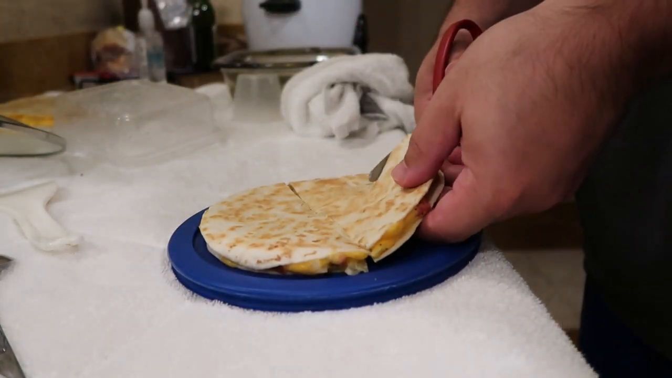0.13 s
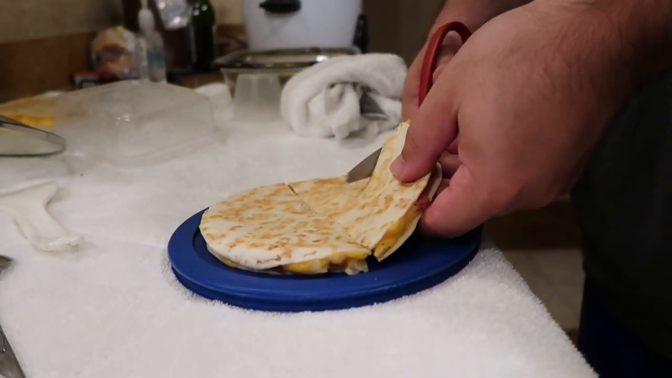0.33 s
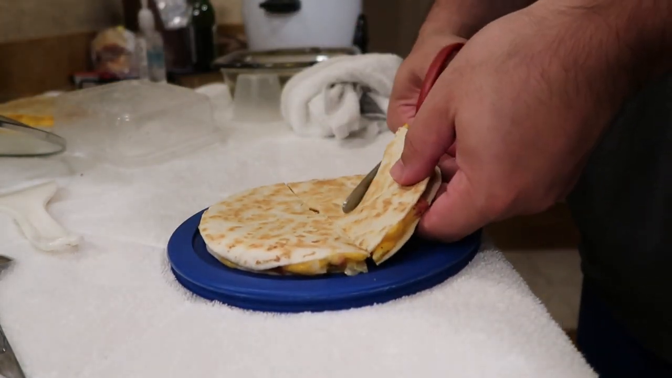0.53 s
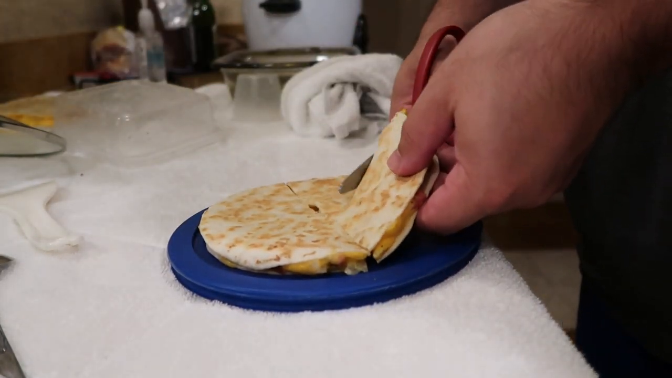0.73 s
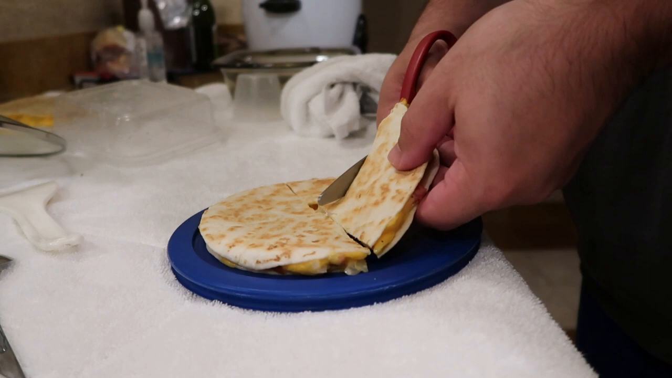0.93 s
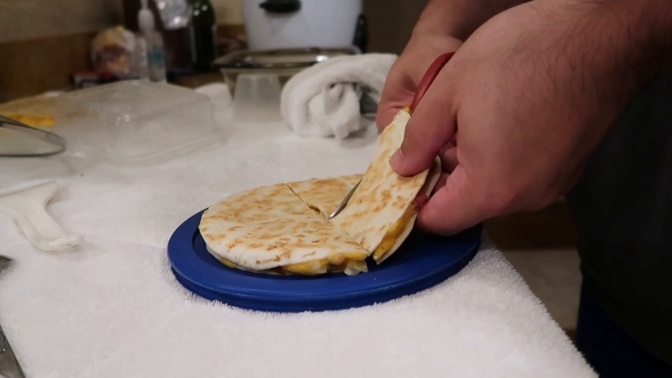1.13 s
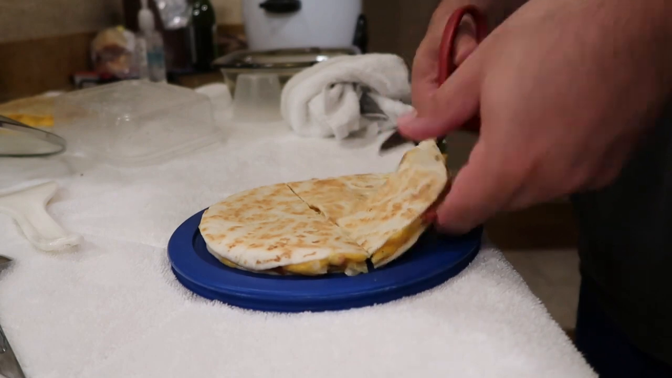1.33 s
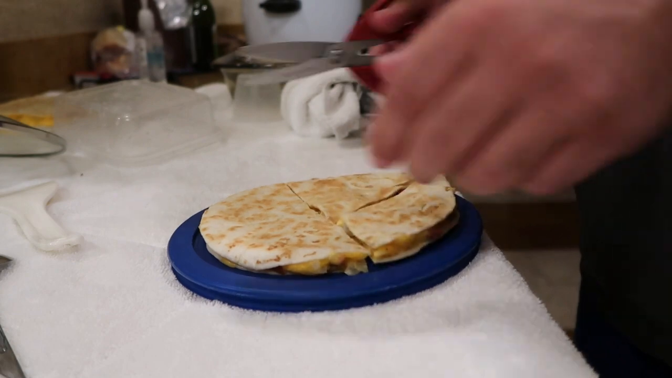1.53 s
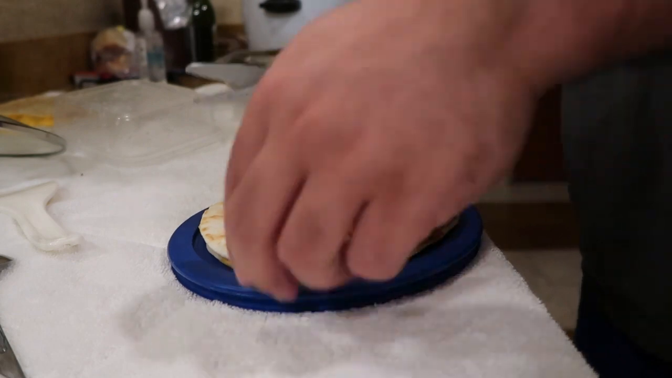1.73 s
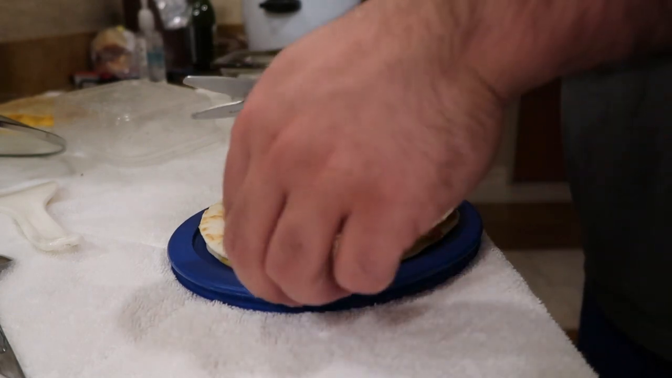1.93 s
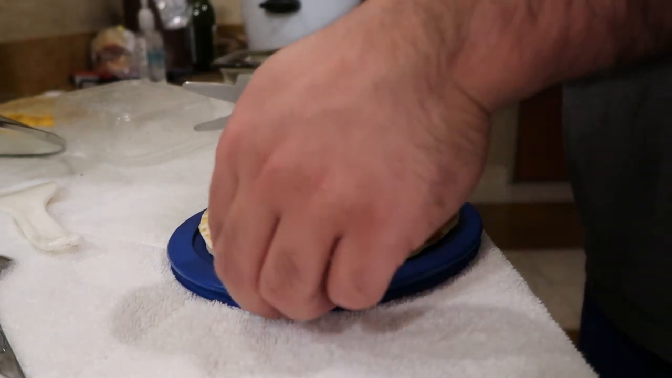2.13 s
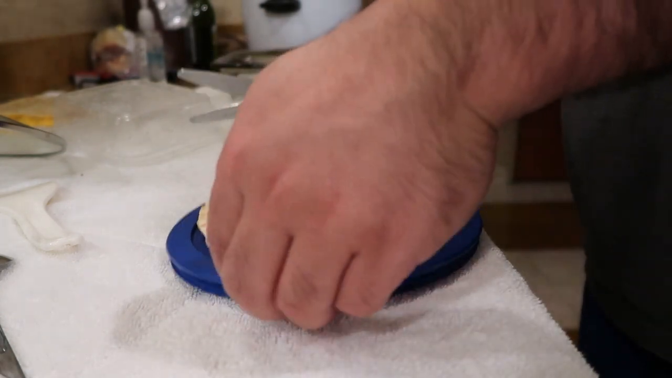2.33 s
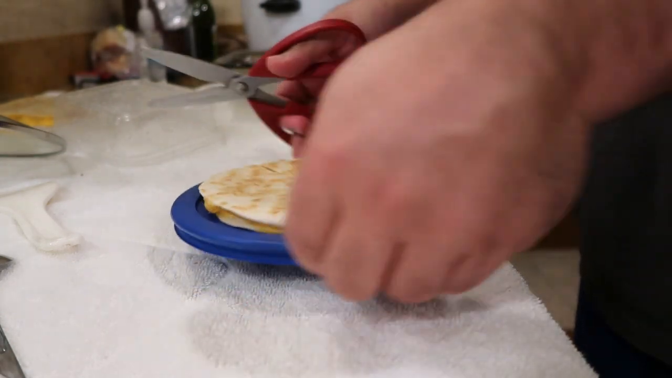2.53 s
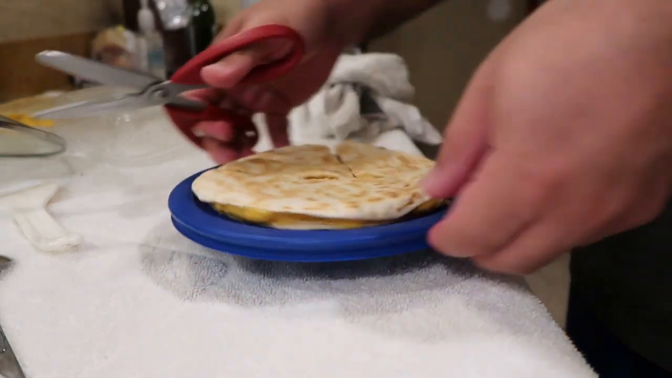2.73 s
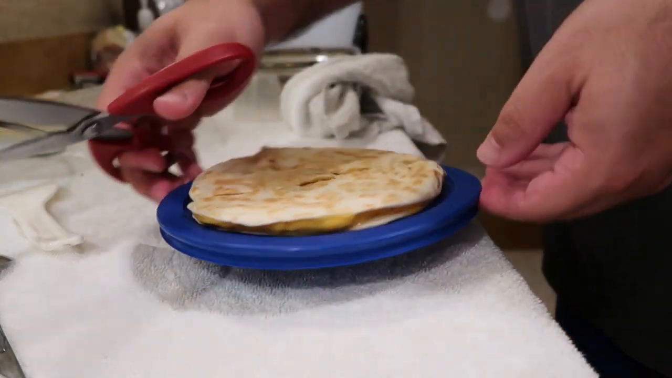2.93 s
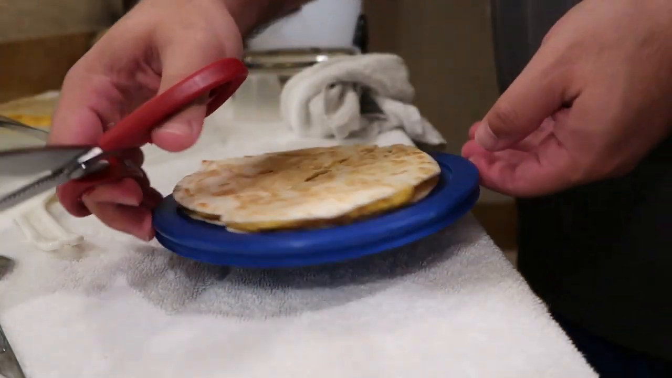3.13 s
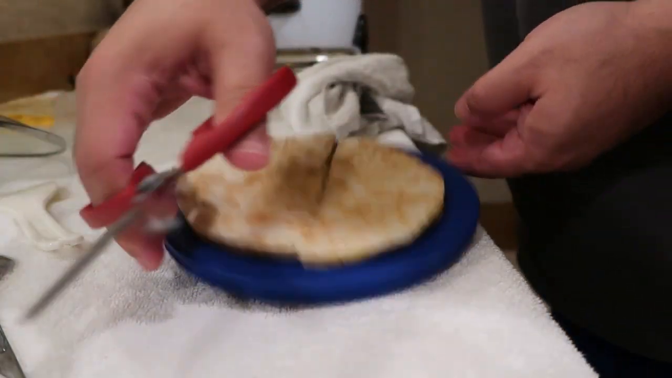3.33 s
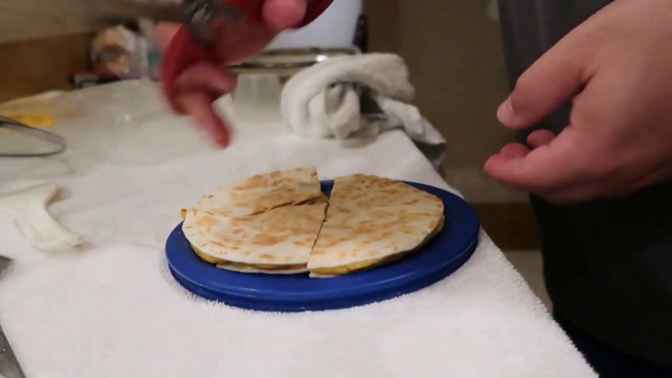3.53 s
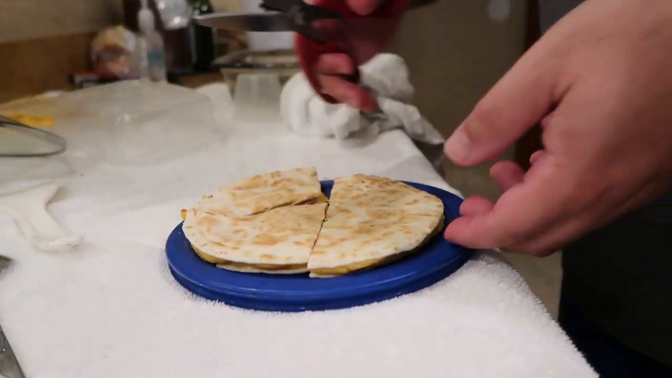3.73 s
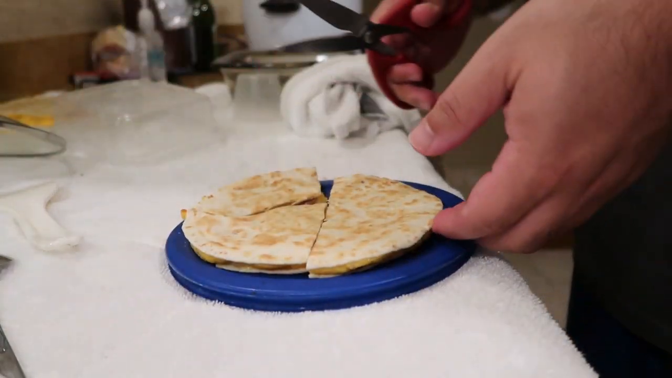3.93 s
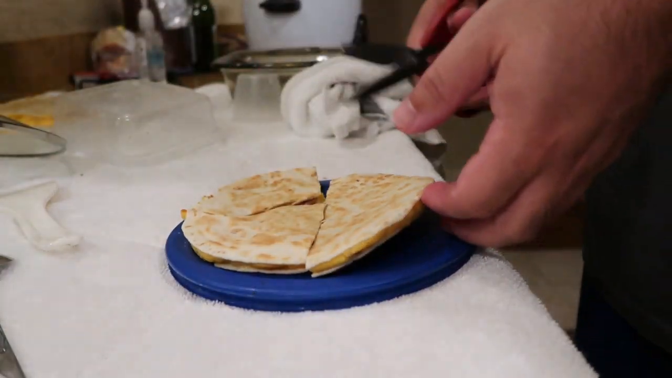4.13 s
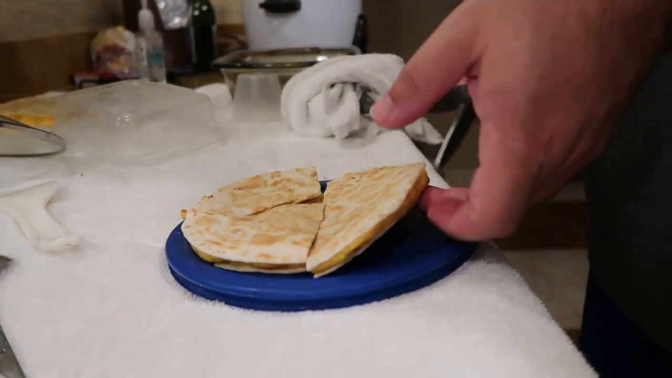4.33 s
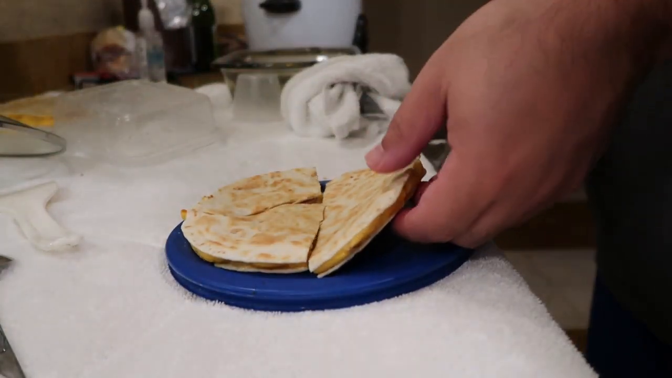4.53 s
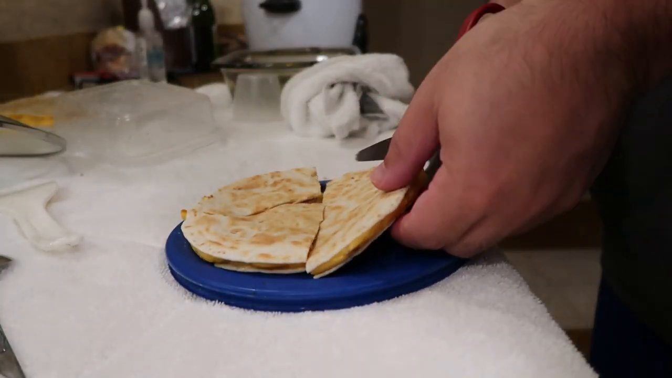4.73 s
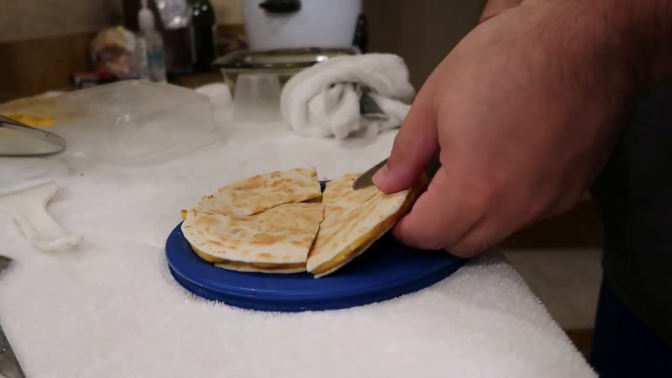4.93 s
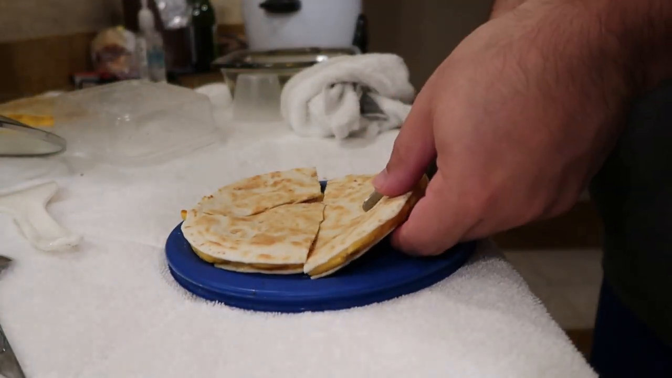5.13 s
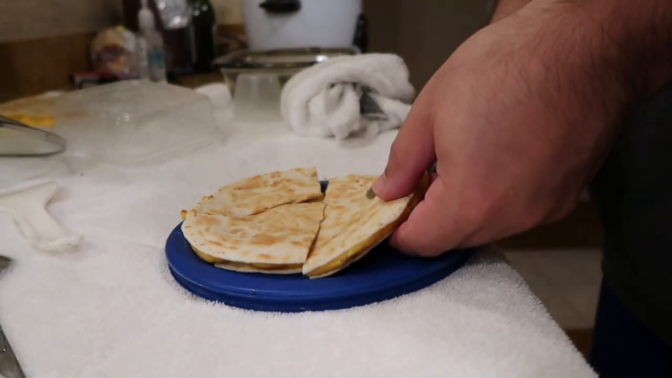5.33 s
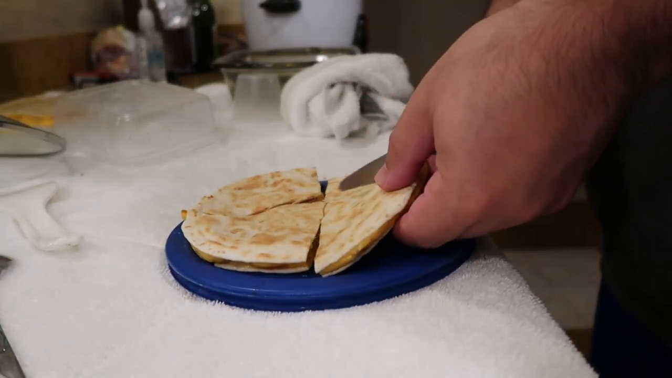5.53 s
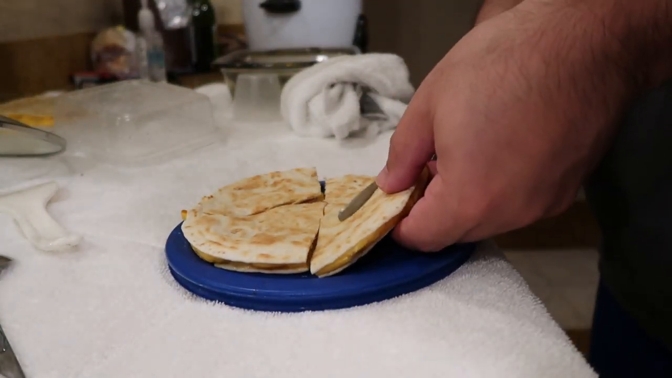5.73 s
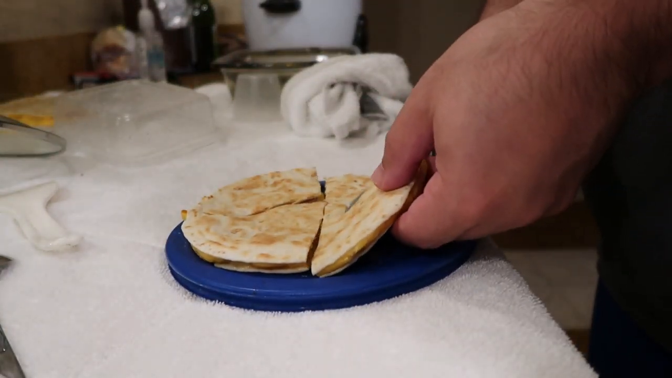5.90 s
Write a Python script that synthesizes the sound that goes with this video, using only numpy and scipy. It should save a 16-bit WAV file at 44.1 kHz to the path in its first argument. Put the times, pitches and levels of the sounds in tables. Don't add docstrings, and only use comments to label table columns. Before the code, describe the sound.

Three crunchy scissor snips come in quick succession, the third hardest, with small crust cracks and plate ticks around them. Only the low motor roar remains briefly, then a hollow rap and a hard plastic plate landing on the counter. Sparse knocks and taps lead to one last snip. Close stereo microphone, short lively kitchen echo.

```python
import sys
import numpy as np
from scipy import signal
from scipy.fft import rfft, irfft
from scipy.io import wavfile
from scipy.ndimage import uniform_filter1d

SR = 44100
rng = np.random.default_rng(int(sys.argv[2]) if len(sys.argv) > 2 else 0)


def field_ratio(decibels):
    return 10 ** (np.asarray(decibels, dtype=float) / 20)


def output_pcm(signal):
    pcm = np.clip(np.atleast_2d(signal).T, -1, 1) * 32767
    wavfile.write(sys.argv[1], SR, np.round(pcm).astype(np.int16))


N = 267422

# frequency in Hz, level in dB.
HUM_MID = [(15, -48), (25, -2), (49, 1), (87, -8.5), (161, -2), (285, -12), (373, -10.5), (516, -15),
           (624, -17), (695, -22), (754, -20), (1610, -26.5), (4370, -34.5), (12900, -53), (16000, -63)]
# frequency in Hz, level in dB.
HUM_SIDE = [(15, -53), (25, -26), (223, -4), (427, -5), (503, -10), (1260, -15.5), (3520, -23),
            (4870, -22.5), (6210, -29), (13200, -37.5), (16000, -43)]
# frequency in Hz, bandwidth in Hz, level in dB.
DRONES = [(40.2, 13, -69), (61.1, 3.7, -47), (87.9, 10, -50.5), (116, 7.9, -52), (164, 14.2, -53.5),
          (196.7, 10.7, -62), (389.9, 83, -57)]
HUM_DB, HUM_SIDE_DB = -41.5, -55.5

# start in seconds, end in seconds, first force in dB,
# last force in dB, share of steel hiss in dB.
STROKES = [(0.0, 0.033, -49, -58, -18), (0.132, 0.172, -59, -51.5, -22), (0.554, 0.678, -61.5, -48.5, -18),
           (1.058, 1.14, -59, -61, -19), (1.138, 1.192, -60, -43.5, -22), (1.383, 1.42, -52, -61, -22),
           (1.428, 1.517, -49.5, -59, -17), (3.393, 3.463, -54, -53, -20), (3.46, 3.485, -53, -43, -25),
           (5.04, 5.153, -65, -55.5, -13), (5.155, 5.277, -49.5, -53, -13.5), (5.705, 5.754, -52, -64, -12),
           (5.762, 5.876, -64, -49, -26), (1.53, 1.582, -49, -66, -11)]
# frequency in Hz, level in dB.
CRUST = [(700, 4), (1500, 7.5), (2500, 4), (4000, -1), (5500, -9.5), (8000, -27)]
# frequency in Hz, level in dB.
STEEL = [(3000, -16), (6000, 8), (9000, 2), (12500, -5), (15000, 1), (16500, -14)]
EASE_S = 0.0038
BITE_DB, BITE_S, BITE_HISS_DB = -25, 0.0044, -8

# start in seconds, peak in dB, brightness in dB per octave, room send in dB.
SNIPS = [
    (0.034, -16, -0.1, -0.5),
    (0.6822, -16.5, -0.5, -1),
    (1.1956, -11, -0.15, -2),
    (5.878, -15, -1.1, -2),
]
# frequency in Hz, level in dB.
BLADES = [(180, -33), (300, -7), (713, 0.5), (1120, -8.5), (1660, 6.5), (2170, 1), (3080, 2.5),
          (3580, -4.5), (4520, 2), (7320, -8), (10900, -7.5), (14000, -15), (15000, -30), (16000, -53)]
# frequency in Hz, time to fall 60 dB in seconds, level in dB.
BLADE_MODES = [(1710, 0.037, -4), (2630, 0.018, 0), (4600, 0.042, 3), (5280, 0.035, -10), (9300, 0.033, -1),
               (10900, 0.077, -5)]

# start in seconds, peak in dB, pitch in Hz, room send in dB.
CRACKS = [(0.159, -38, 3500, -8), (0.6085, -48, 3000, 8), (0.6404, -38, 3080, -9), (0.6476, -31, 3200, 1),
          (0.6603, -26.5, 2600, -16), (1.097, -41, 3030, -5), (1.448, -30.5, 2320, -5),
          (1.482, -36, 2830, -15), (1.4869, -33.5, 2520, -14), (1.5274, -25, 3220, -6.5),
          (1.9277, -56, 3330, 8), (4.5373, -46, 2520, -8), (5.171, -38, 2820, -9), (5.225, -37, 2330, -16),
          (5.266, -33, 1750, -6), (5.4046, -44, 2690, -18), (5.7106, -36.5, 2900, -14),
          (5.8052, -39.5, 3300, -15), (0.137, -44, 2800, -10), (1.148, -44, 3200, -10),
          (5.38, -46, 3600, -10), (5.762, -44, 2500, -10), (3.471, -40, 2800, -8)]
FLAKE_WIDTH_HZ = 1430

# start in seconds, peak in dB, brightness in dB per octave,
# room send in dB.
TAPS = [
    (0.2485, -40, -3, -5),
    (1.386, -37, 2, 0.5),
    (1.436, -35, 6, -2),
    (1.537, -27.5, -0.2, -11.5),
    (3.834, -33.5, 0, -10),
    (5.155, -26.5, -0.5, -5),
    (5.452, -20, -0.2, -5.5),
]
# frequency in Hz, level in dB.
TIP = [(180, -24), (300, -2), (531, 1.5), (806, -9.5), (1590, -1.5), (1940, -10), (2230, -6), (2990, -11.5),
       (3380, -12.5), (6280, -47), (6780, -45), (12000, -56), (15600, -82), (22000, -120)]
# start in seconds, peak in dB, brightness in dB per octave,
# room send in dB.
KNOCKS = [
    (0.909, -27.5, 0.1, -2.5),
    (3.882, -30, 0.1, -6),
    (4.231, -41, 0.1, -3),
    (4.673, -27.5, 0.1, 0),
    (5.664, -31, 0.1, -1),
    (6.031, -19.5, 0.1, -8),
]
# frequency in Hz, level in dB.
BASE = [(180, -28), (300, -5), (902, 2), (1340, -9.5), (2020, -1.5), (2790, -28.5), (3000, -10.5),
        (3690, -18.5), (5320, -38), (5900, -36), (6830, -45), (10000, -58), (13000, -78), (22000, -120)]
# start in seconds, peak in dB, brightness in dB per octave, room send in dB.
RAP = [
    (3.029, -16.5, 0.1, -5.5),
]
# frequency in Hz, level in dB.
RIM = [(290, -28), (500, -15), (972, -2.5), (1260, -18.5), (1560, 5.5), (2280, -7), (2580, -18),
       (2890, -2.5), (3280, -14.5), (4110, -19.5), (6060, -39), (9280, -52), (10000, -72), (13000, -104),
       (22000, -120)]
# start in seconds, peak in dB, brightness in dB per octave, room send in dB.
LANDING = [
    (3.4849, -20.5, -10.5, -7),
    (3.4898, -16, -0.5, -3.5),
    (3.4963, -16, 3.5, -15),
    (3.4979, -5, 0.3, -9),
    (3.5736, -38.5, 2, 3),
]
# frequency in Hz, level in dB.
LANDED = [(71, -17.5), (120, -2.5), (455, -9), (1090, 2), (1300, -2), (1470, -18), (1990, -0.5),
          (2290, -13), (3300, -14.5), (3870, -20.5), (4200, -24), (6420, -34), (9050, -47), (12500, -50),
          (15000, -61)]
# start in seconds, level in dB, frequency in Hz,
# time to fall 60 dB in seconds.
THUMP = [
    (3.488, -26, 70, 0.15),
    (3.495, -36, 39.7, 0.96),
]

# frequency in Hz, time to fall 60 dB in seconds.
KITCHEN = [(250, 0.44), (660, 0.48), (1740, 0.32), (4590, 0.25), (12100, 0.29)]
# delay in seconds, level in dB.
EARLY = [(.0031, -16), (.0059, -12), (.0088, -14), (.011, -15), (.016, -15), (.024, -15)]
# frequency in Hz, likeness from -1 to 1.
ALIKE = [(300, 1.0), (1500, 1), (3000, 0.91), (6000, 0.22), (9000, -0.49), (13000, -0.81)]
# frequency in Hz, side over mid in dB.
WIDEN = [(300, -31), (1000, -23), (2500, -22), (4500, -5.5), (8000, 0), (11000, 9.5), (15000, -7)]


def evened(x):
    return x / np.sqrt(np.mean(x ** 2) + 1e-20)


def read(points, hz):
    f, value = np.transpose(points)
    return np.interp(np.log(hz + 1), np.log(f + 1), value)


def add(mix, s, sound):
    part = mix[..., round(s * SR):][..., :len(sound)]
    part += sound[:part.shape[-1]]


def colour(points, tilt_db=0):
    hz = abs(np.fft.fftfreq(2048, 1 / SR))
    log_gain = np.log(field_ratio(read(points, hz) + tilt_db * np.log2((hz + 100) / 3000)))
    return np.fft.ifft(np.exp(np.conj(signal.hilbert(log_gain)))).real[:1024]


def shaped_noise(points, patchy_db):
    hz = np.fft.rfftfreq(2048, 1 / SR)
    a, b, patches = rng.standard_normal((N // 512 + 5, 1025, 3)).T
    patches = uniform_filter1d(patches, size=20, axis=0)
    patches = evened(uniform_filter1d(patches, size=8, axis=1))
    z = (a + 1j * b) * field_ratio(read(points, hz)[:, None] + patchy_db * patches)
    return evened(signal.istft(z, nperseg=2048, noverlap=1536)[1][:N])


def place(near, sends, s, db, sound, smooth, send_db):
    sound = field_ratio(db) * sound / abs(sound).max()
    add(near, s, sound)
    add(sends, s, field_ratio(send_db) * smooth * np.linalg.norm(sound) / np.linalg.norm(smooth))


def jolts(draw, t60):
    t = np.arange(len(draw)) / SR
    blows = draw * abs(draw)
    envelope = (1 - np.exp(-t / 0.0006)) * field_ratio(-60 * t / t60)
    z = rfft(blows * envelope, 2048)
    flat = z / np.sqrt(uniform_filter1d(abs(z) ** 2, size=15))
    return irfft(flat)[:len(draw)]


def struck(near, sends, blows, body, rattle_s, air_db=-1.7):
    t = np.arange(1024) / SR
    for (s, db, tilt_db, send_db), draw in zip(blows, rng.standard_normal((len(blows), 400))):
        sound = np.convolve(jolts(draw, rattle_s), colour(body, tilt_db))
        blurred = colour(body, tilt_db + air_db) * np.exp(-t / 0.00084)
        place(near, sends, s, db, sound, blurred, send_db)


def hum():
    mid = field_ratio(HUM_DB - 3.0) * shaped_noise(HUM_MID, 1.63)
    t = np.arange(N) / SR
    for (hz, width, db), a in zip(DRONES, rng.standard_normal((len(DRONES), 2, N))):
        r = np.exp(-np.pi * width / SR)
        wobble = signal.lfilter([1], [1, -2 * r, r * r], a[0] + 1j * a[1])
        mid = mid + field_ratio(db) * evened((wobble * np.exp(2j * np.pi * hz * t)).real)
    side = field_ratio(HUM_SIDE_DB) * shaped_noise(HUM_SIDE, 1.05)
    return np.array([mid + side, mid - side])


def shear():
    size = field_ratio(4.6 * np.minimum(rng.exponential(1, N), 4))
    grains = size * (rng.random(N) < 3000 / SR) * rng.choice([-1, 1], N)
    crust = evened(signal.oaconvolve(grains, colour(CRUST))[:N])
    steel = evened(signal.oaconvolve(rng.standard_normal(N), colour(STEEL))[:N])
    t, out = np.arange(N) / SR, np.zeros(N)
    for start, end, first_db, last_db, hiss_db in STROKES:
        at = slice(max(round(start * SR), 0), round(end * SR))
        ease = np.clip(np.minimum(t[at] - start, end - t[at]) / EASE_S, 0, 1)
        force = field_ratio(np.interp(t[at], [start, end], [first_db, last_db])) * ease
        out[at] += force * (crust[at] + field_ratio(hiss_db) * steel[at])
    for s, db, _, _ in SNIPS:
        at = slice(round(s * SR) - 1000, round(s * SR))
        squeeze = field_ratio(db + BITE_DB) * np.exp((t[at] - s) / BITE_S)
        out[at] += squeeze * (crust[at] + field_ratio(BITE_HISS_DB) * steel[at])
    return out


def snips(near, sends):
    struck(near, sends, SNIPS, BLADES, 0.0085, air_db=2.5)
    hz, t60, mode_db = np.transpose(BLADE_MODES)[:, :, None]
    t = np.arange(2000) / SR
    draws = rng.standard_normal((len(SNIPS), 2, len(BLADE_MODES), 1))
    for (s, db, _, send_db), (level_draw, pitch_draw) in zip(SNIPS, draws):
        decay = field_ratio(mode_db + 2 * level_draw - 60 * t / t60)
        ring = decay * np.sin(2 * np.pi * hz * (1 + pitch_draw / 50) * t)
        ring = ring.sum(0) * (1 - np.exp(-t / 0.00047))
        place(near, sends, s, db - 20.5, ring, ring, send_db)


def cracks(near, sends):
    t = np.arange(300) / SR
    for (s, db, hz, send_db), draw in zip(CRACKS, rng.standard_normal((len(CRACKS), 300))):
        flake = t ** 2 * np.exp(-1.7 * np.pi * FLAKE_WIDTH_HZ * t) * np.sin(2 * np.pi * hz * t)
        place(near, sends, s, db, np.convolve(jolts(draw, 0.0074), flake), flake, send_db)


def plate(near, sends):
    struck(near, sends, TAPS, TIP, 0.0094)
    struck(near, sends, KNOCKS, BASE, 0.0056)
    struck(near, sends, RAP, RIM, 0.0028)
    struck(near, sends, LANDING, LANDED, 0.011, air_db=1.2)


def thump():
    t, out = np.arange(SR) / SR, np.zeros(N)
    for s, db, hz, t60 in THUMP:
        swell = 1 - np.exp(-t / 0.0074)
        add(out, s, field_ratio(db - 60 * t / t60) * np.sin(2 * np.pi * hz * t) * swell)
    return out


def kitchen(x):
    taps = np.zeros((2, SR))
    at = np.arange(200, SR - 20, 20) + rng.integers(0, 20, (2, (SR - 201) // 20))
    np.put_along_axis(taps, at, rng.choice([-1., 1.], at.shape), 1)
    hz, t, z = signal.stft(taps, SR, nperseg=256)
    alike = np.clip(read(ALIKE, hz), -1, 1)[:, None]
    z[1] = alike * z[0] + np.sqrt(1 - alike ** 2) * z[1]
    decay = field_ratio(-60 * t / read(KITCHEN, hz)[:, None])
    tail = signal.istft(z * decay, SR, nperseg=256)[1]
    tail /= np.linalg.norm(tail[0])
    for (s, db), lag in zip(EARLY, rng.integers(-2, 3, len(EARLY))):
        tail[[0, 1], [round(s * SR), round(s * SR) + lag]] += field_ratio(db)
    return signal.fftconvolve(x[None], tail, axes=1)[:, :N]


def ports(x):
    width = field_ratio(read(WIDEN, np.fft.rfftfreq(N, 1 / SR)))
    side = irfft(rfft(x) * -1j * width, N)
    return np.array([x + side, x - side])


def scene():
    near = shear()
    sends = field_ratio(-11.5) * near
    for source in (snips, plate, cracks):
        source(near, sends)
    return ports(near) + kitchen(sends) + thump() + hum()


def top_cut(x):
    return signal.sosfilt(signal.butter(12, 16470, fs=SR, output="sos"), x)


def record(dry):
    return top_cut(dry)


dry = scene()
out = record(dry)
output_pcm(out)
```